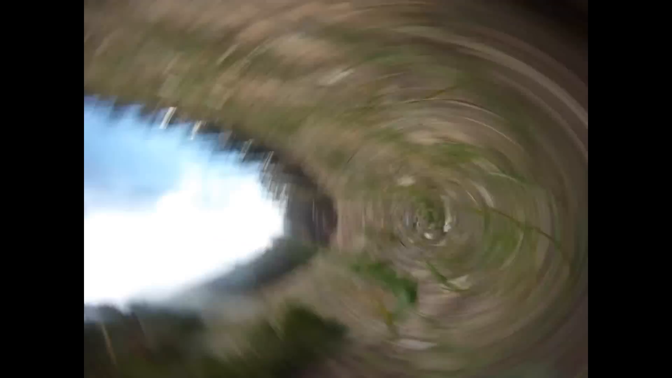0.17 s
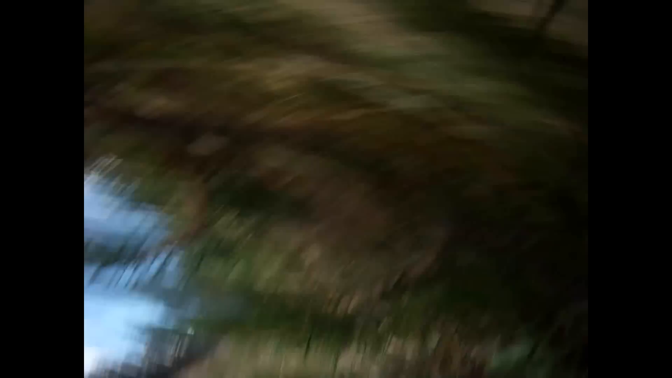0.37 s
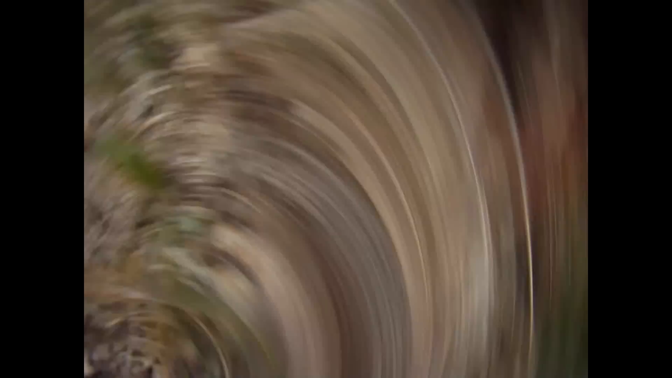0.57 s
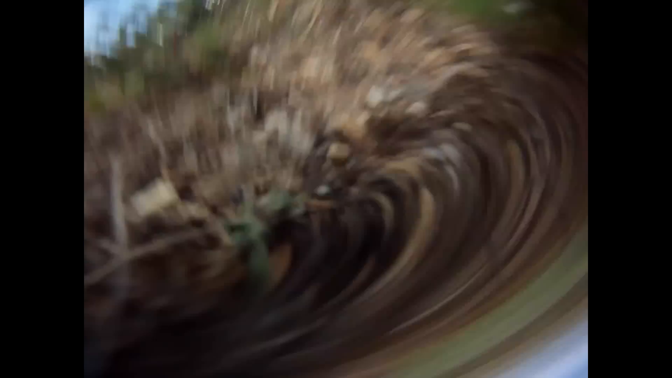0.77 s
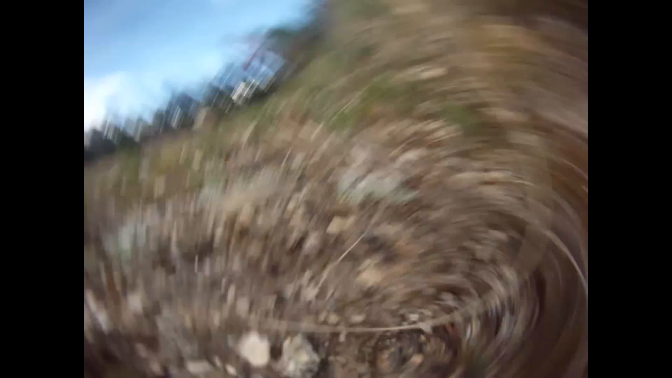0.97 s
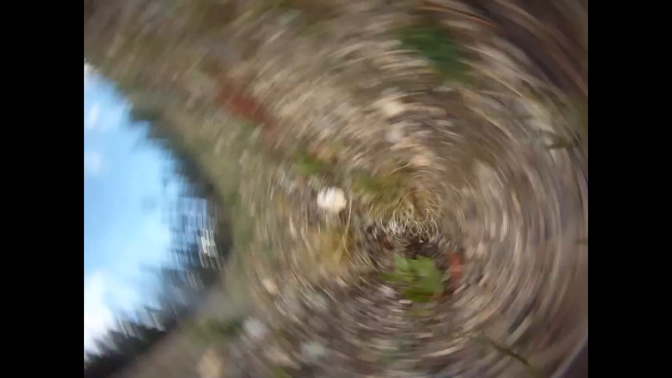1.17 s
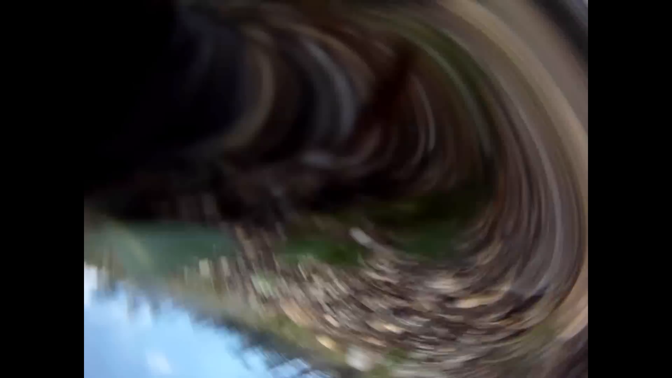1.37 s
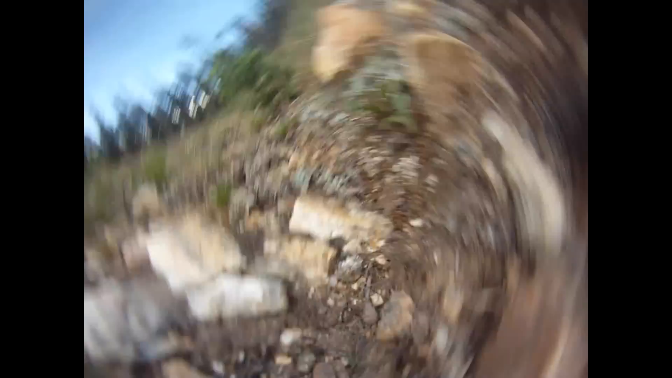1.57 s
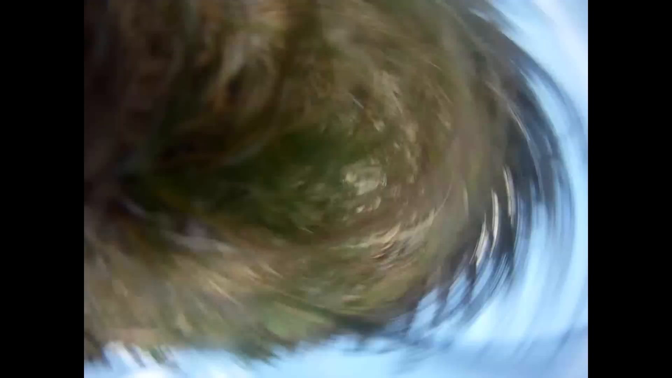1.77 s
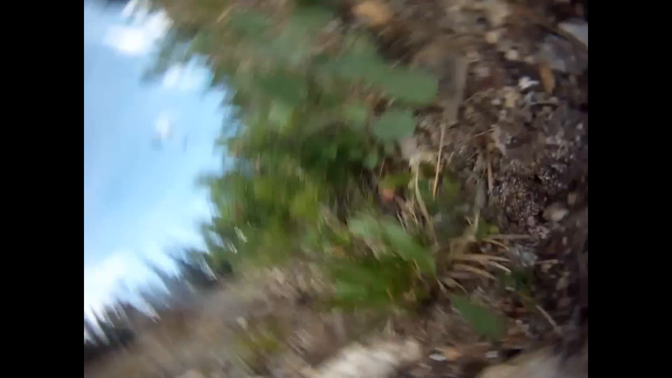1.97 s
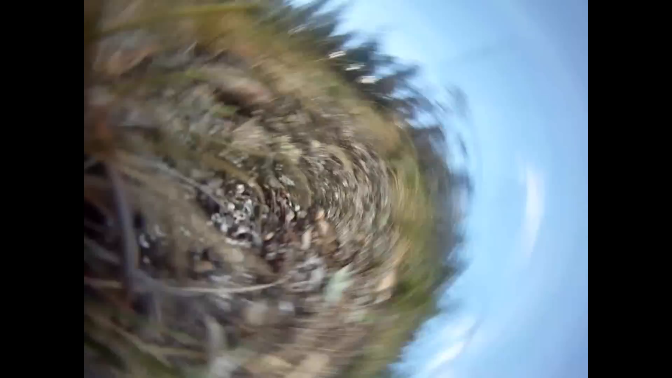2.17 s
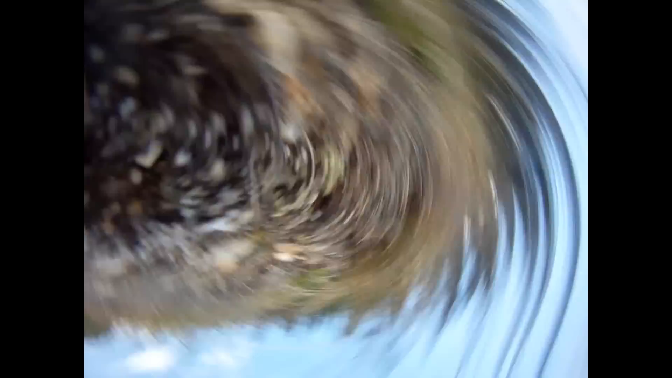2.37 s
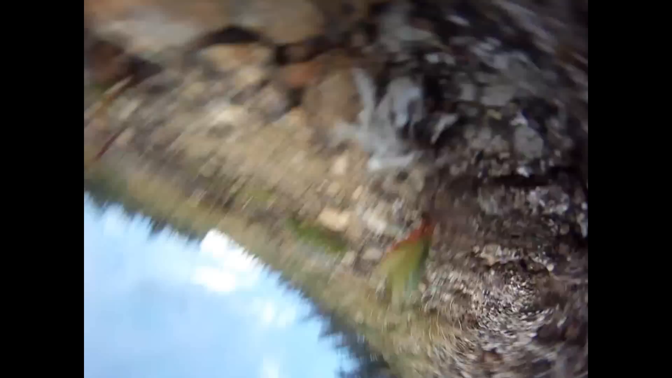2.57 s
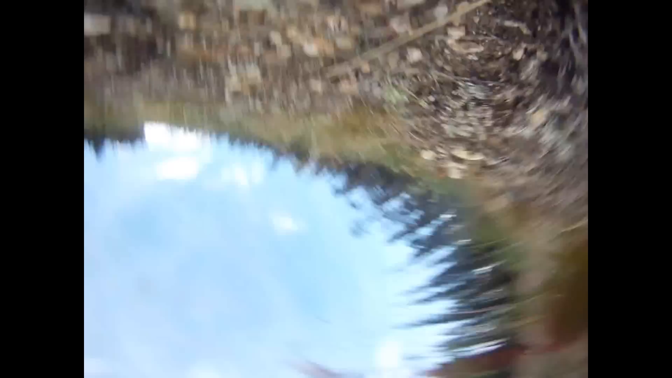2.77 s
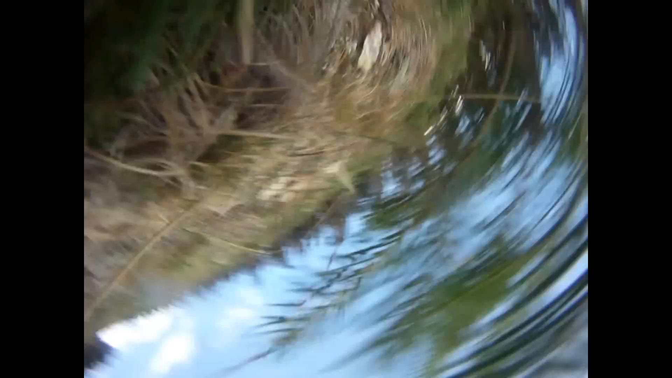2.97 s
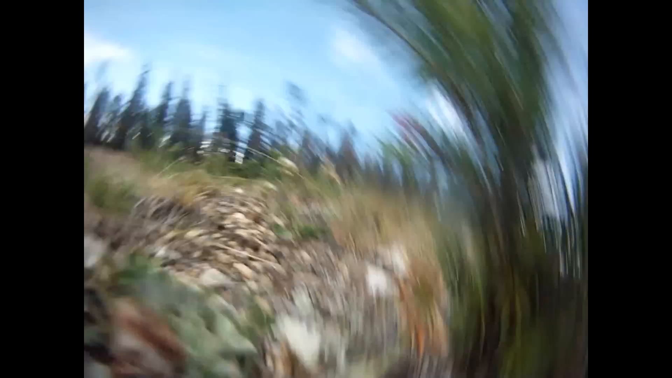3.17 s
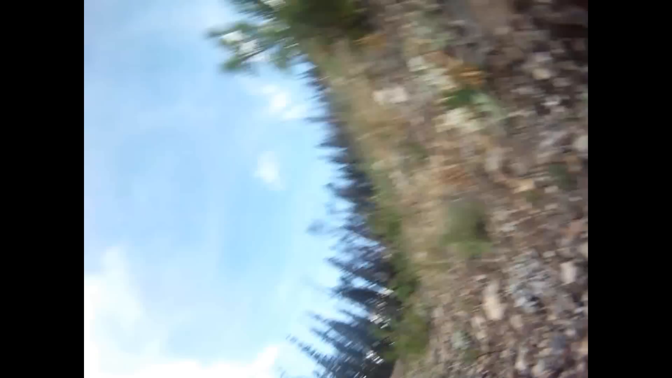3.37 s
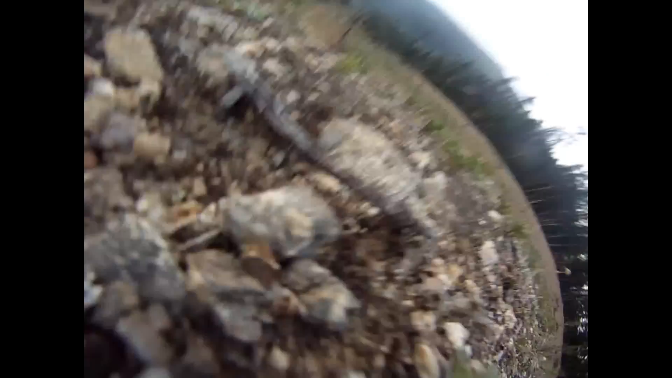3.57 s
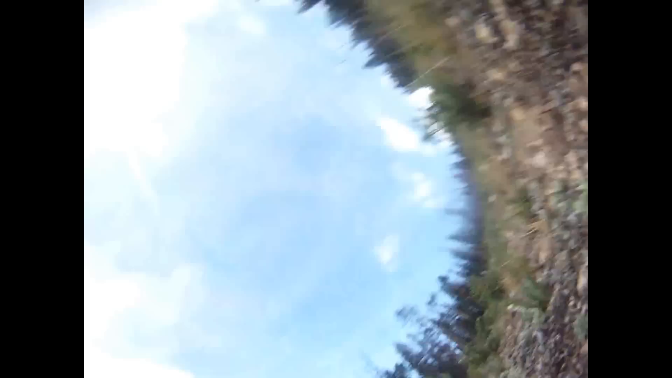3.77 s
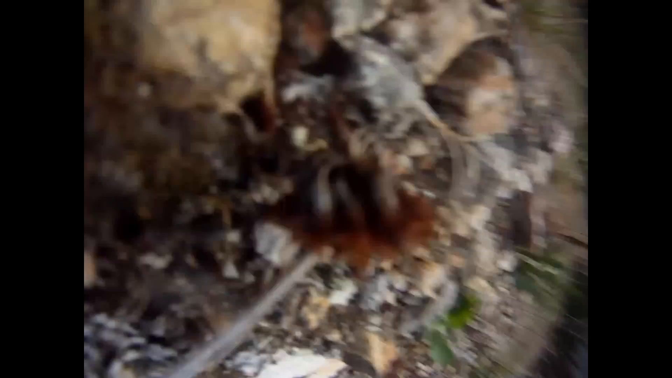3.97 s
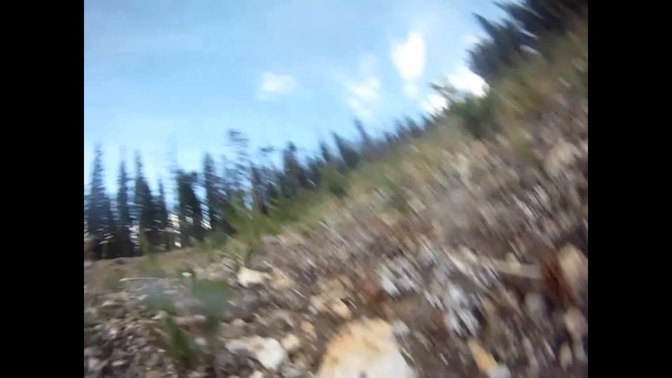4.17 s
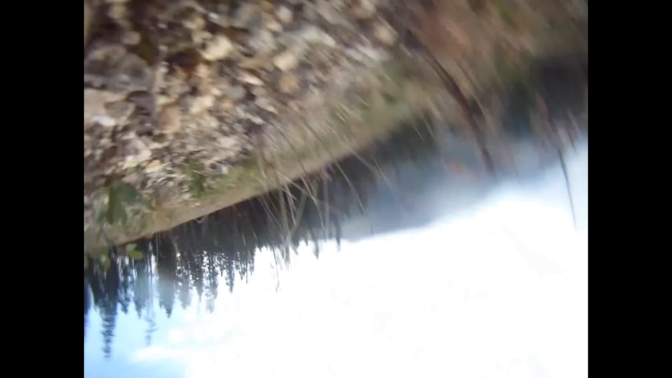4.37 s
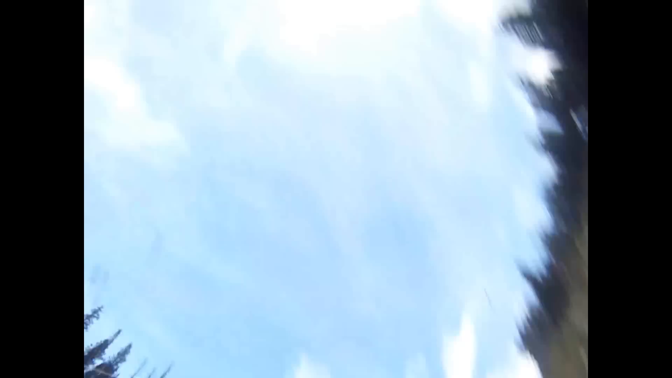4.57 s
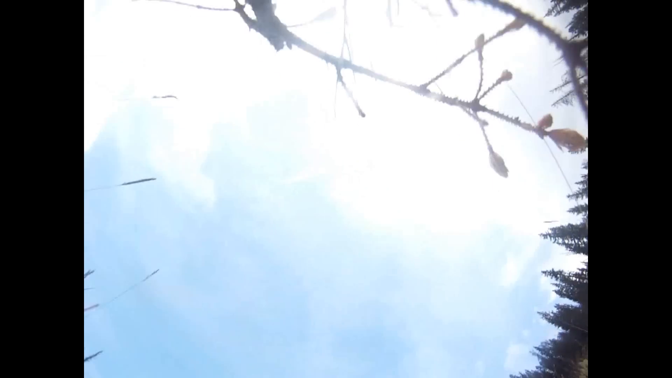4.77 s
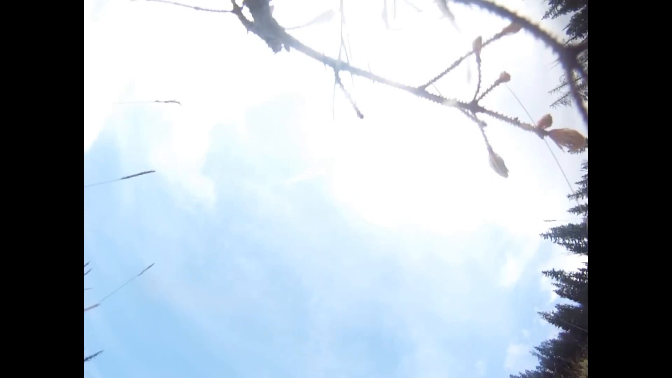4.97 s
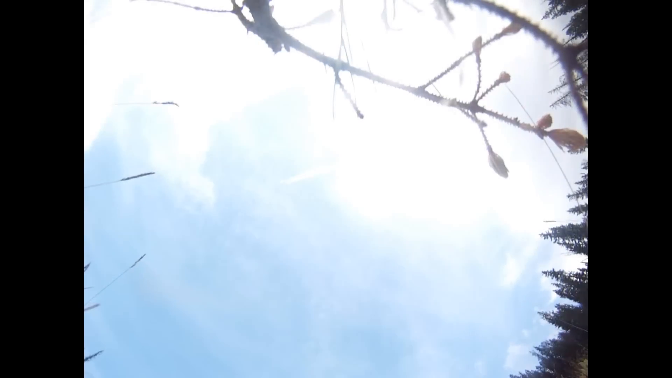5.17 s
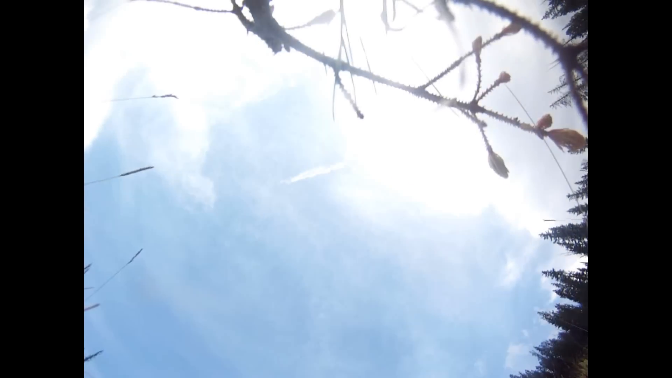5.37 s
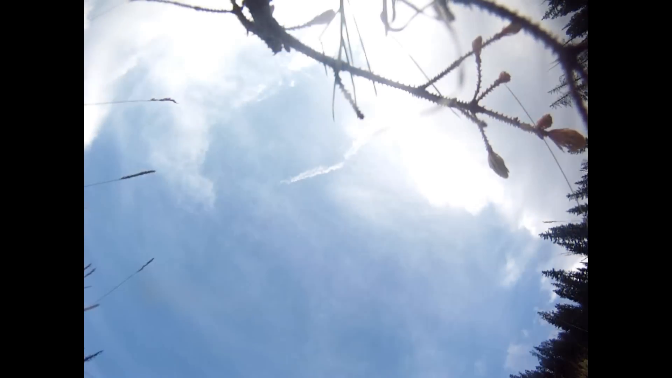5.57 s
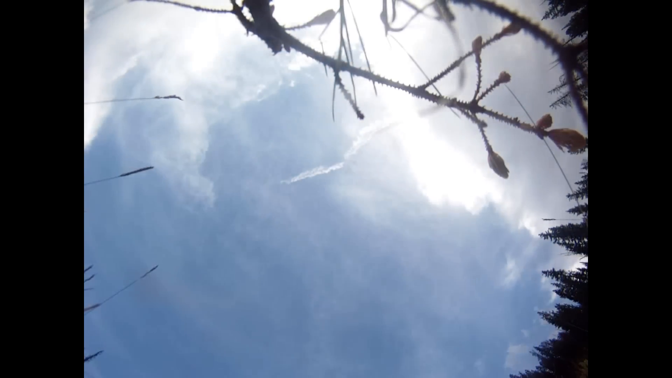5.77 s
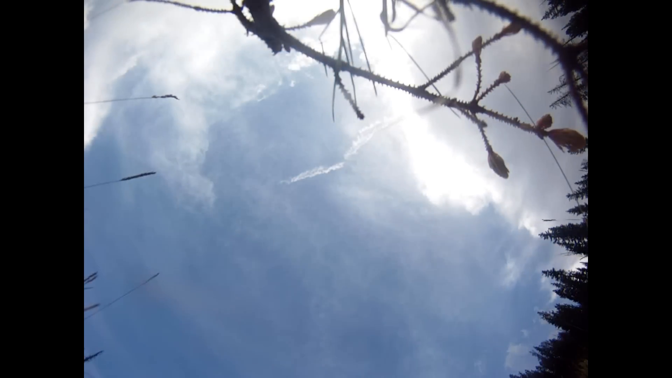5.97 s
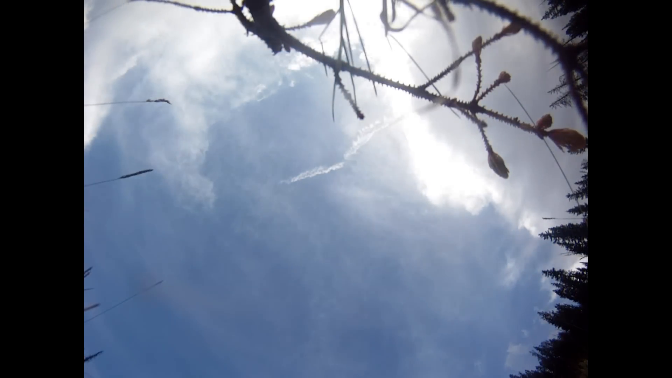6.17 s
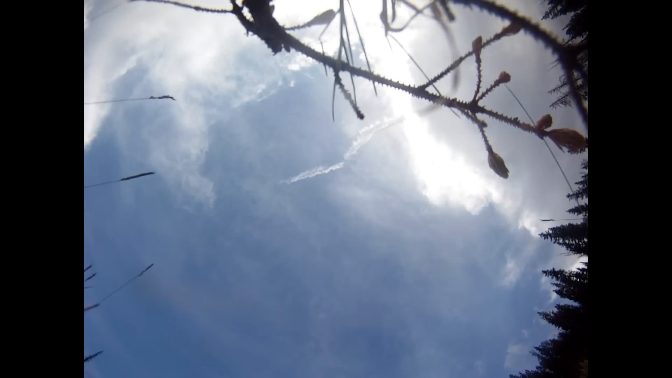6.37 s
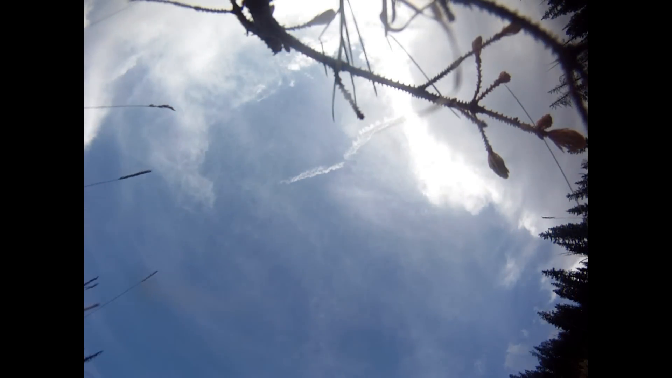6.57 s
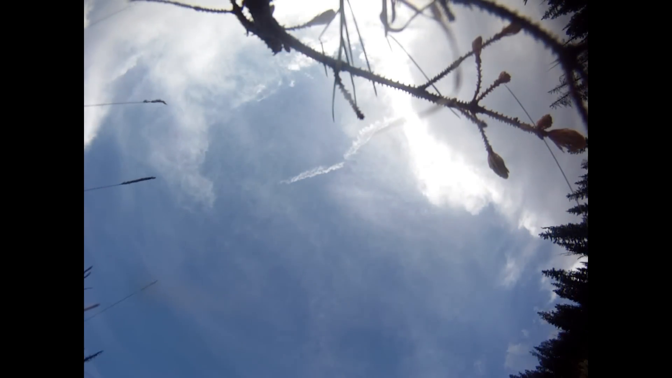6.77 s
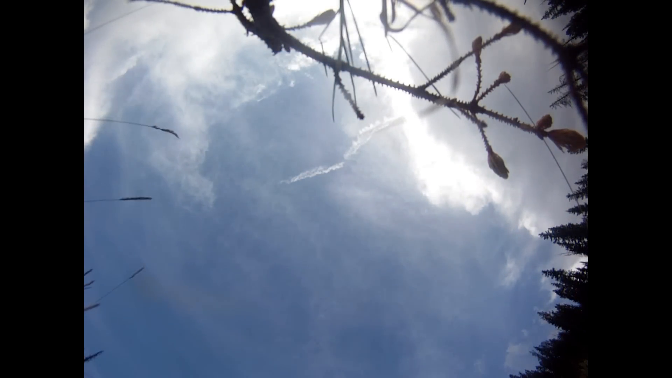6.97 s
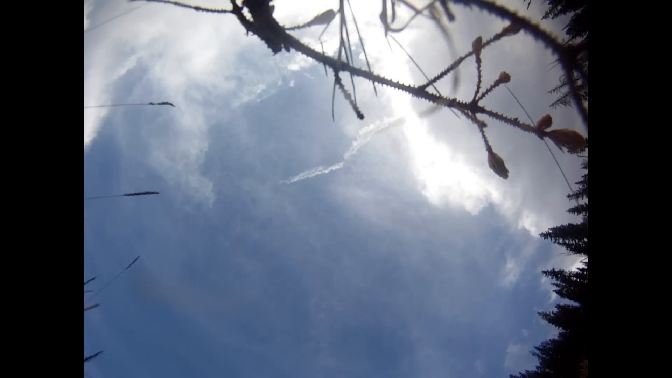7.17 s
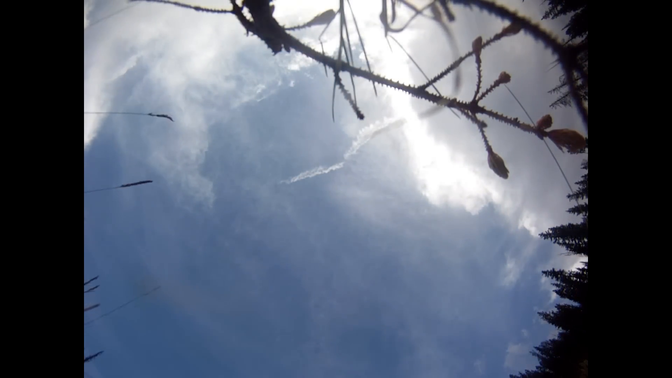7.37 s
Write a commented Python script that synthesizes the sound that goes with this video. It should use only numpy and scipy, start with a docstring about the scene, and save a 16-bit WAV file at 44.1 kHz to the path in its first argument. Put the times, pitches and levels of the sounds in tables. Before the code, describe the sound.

Hard, clacking hits come in quick, uneven succession as a little camera bounces over stones outdoors. The sound is extremely close, picked up by the camera itself, with dull thumps and short gritty scrapes among the knocks, and the strongest blows overload. The tumbling lasts roughly five seconds and stops. Then the air is very quiet, with a soft hiss and some tiny ticks as something brushes the case.

```python
"""A small camera tumbling down a stony slope.

The camera has come off a bike and is heard through its own microphone. Impacts on stones excite the
modes of its case and overload the input, and heavy landings push a thump of air into the port.
Between blows, friction with grit and dry grass drives the same modes. After about five seconds the
camera lies still in quiet open air, with a few faint ticks."""
import sys
import numpy as np
from scipy import signal
from scipy.fft import rfft, irfft
from scipy.io import wavfile
from scipy.ndimage import uniform_filter1d

SR = 44100
rng = np.random.default_rng(int(sys.argv[2]) if len(sys.argv) > 2 else 0)


def dump(signal):
    """Clip the signal to [-1, 1] and save it as 16-bit WAV at the path in sys.argv[1]."""
    limited = np.clip(np.atleast_2d(signal).T, -1, 1)
    pcm = np.round(limited * 32767).astype(np.int16)
    wavfile.write(sys.argv[1], SR, pcm)


N = 327661
TIME = np.arange(N) / SR
REST_S = 4.97   # the case has stopped rolling


def from_db(db):
    """Amplitude ratio of a level in decibels."""
    return 10 ** (np.asarray(db) / 20)


def rms_one(x):
    """Power normalisation: a lasting sound scaled to rms 1."""
    return x / np.sqrt(np.mean(x ** 2) + 1e-20)


def unit_energy(x):
    """Energy normalisation: a short sound scaled to energy 1."""
    return x / np.sqrt(np.sum(x ** 2) + 1e-20)


def band(x, low_hz, high_hz, order=2):
    """Butterworth band-pass filter."""
    edges_hz = [low_hz, min(high_hz, .45 * SR)]
    return signal.sosfilt(signal.butter(order, edges_hz, "band", fs=SR, output="sos"), x)


def band_noise(low_hz, high_hz, order=2):
    """Band-limited Gaussian noise of rms 1."""
    return rms_one(band(rng.standard_normal(N), low_hz, high_hz, order))


def resonate(x, hz, width_hz):
    """A damped resonator with unit gain at its peak."""
    r = np.exp(-np.pi * width_hz / SR)
    feedback = [1, -2 * r * np.cos(2 * np.pi * hz / SR), r * r]
    return signal.lfilter((1 - r * r) / 2 * np.array([1, 0, -1]), feedback, x + 1e-18)


def add(track, s, sound):
    """Superposition: a short sound joins the track at time s."""
    at = max(round(s * SR), 0)
    track[at:at + len(sound)] += sound[:N - at]


# Spectrum of still air and hiss. Each row: frequency in Hz, relative spectral density in dB.
AIR_SPECTRUM = [(15, -32), (25, -1), (118, -3.5), (181, -6.5), (501, -14), (621, -14.5), (4260, -24),
                (5880, -31), (15000, -30.5)]

def air():
    """Stationary coloured noise: a soft rush of open air with microphone hiss."""
    hz, db = np.transpose(AIR_SPECTRUM)
    bins_hz = np.arange(N // 2 + 1) * SR / N
    colour = from_db(np.interp(np.log(bins_hz + 1), np.log(hz), db))
    return from_db(-67) * rms_one(irfft(rfft(rng.standard_normal(N)) * colour, N))


def buffet():
    """Turbulence: air tugs at the port, very low, for as long as the camera spins."""
    spinning = np.interp(TIME, [REST_S - .1, REST_S + .1], [1, 0])
    return from_db(-72) * spinning * band_noise(12, 34, order=3)


def grit(per_s, spread_db, size):
    """Shot noise: grains give way as random impulses of uneven strength."""
    strength = from_db(spread_db * np.minimum(rng.exponential(1, size), 4))
    return (rng.random(size) < per_s / SR) * strength * rng.choice([-1, 1], size)


def pebble(force, count=6, low_hz=1900, high_hz=10500):
    """Free vibration: a struck pebble rings for a few milliseconds at its own natural frequencies."""
    modes_hz = low_hz * (high_hz / low_hz) ** rng.random(count)
    return sum(np.sqrt(low_hz / hz) * unit_energy(resonate(force, hz, width_hz=170)) for hz in modes_hz)


# Modes of the case and microphone port. Each row: frequency in Hz, bandwidth in Hz, gain in dB.
CASE_MODES = [(734, 190, -10.5), (1474, 520, -5.5), (2142, 250, 1.5), (2662, 380, -3.5), (2928, 240, -2),
              (3745, 340, -8), (4530, 390, -12), (5310, 140, -15.5), (7143, 780, -18), (8430, 130, -10.5),
              (8920, 160, -11.5), (9846, 290, -9), (14860, 870, -10.5), (13720, 120, -17)]

def struck_case(force, scatter):
    """Modal superposition: each grain touches another spot and so feeds the modes unevenly."""
    out = 0
    for k, (hz, width_hz, db) in enumerate(CASE_MODES):
        coupling = (-1) ** k + scatter * rng.standard_normal(len(force))
        out += from_db(db) * resonate(force * coupling, hz, width_hz)
    return out


def sliding_case(force, wander_db=1.5, turn_s=.06):
    """Moving excitation: one face after another rubs, so the broadened modes swell and fade in turn."""
    out, turns = 0, np.arange(0, TIME[-1], turn_s)
    for k, (hz, width_hz, db) in enumerate(CASE_MODES):
        swell_db = wander_db * np.interp(TIME, turns, rng.standard_normal(len(turns)))
        coupling = (-1) ** k + .35 * rng.standard_normal(N)
        out += from_db(db + swell_db) * resonate(force * coupling, hz, 1.5 * width_hz)
    return rms_one(out)


# Light touches on the resting case. Each row: time in seconds, relative peak level in dB.
TOUCHES = [(4.828, -32), (5.02, -47.5), (5.211, -50), (5.381, -48), (5.8944, -41), (6.0282, -52),
           (6.786, -52), (6.855, -50), (6.928, -44.5), (7.1886, -49), (7.239, -34.5)]

def ticks(settle_s=.0036, size=1500, faint_count=8):
    """Impulse response: tiny touches ring the case, a few clear ones among fainter ones."""
    out = np.zeros(N)
    faint = [(s, -55) for s in rng.uniform(REST_S, TIME[-1] - .1, faint_count)]
    for s, db in list(TOUCHES) + faint:
        force = grit(per_s=5000, spread_db=-2.5, size=size) * np.exp(-TIME[:size] / settle_s)
        force[0] += 3
        tick = struck_case(force, scatter=.32)
        tick += from_db(-2) * resonate(force, 1170, width_hz=340)
        tick += from_db(-.5) * resonate(force, 2365, width_hz=93)
        add(out, s, from_db(db + .5) * tick / np.abs(tick).max())
    return out


def crunches(count=240, size=900, fade_s=.002):
    """Random impacts: single pebbles and stalks snap past the moving case, each with its own ring."""
    out = np.zeros(N)
    for when, weakness in rng.random((count, 2)):
        force = grit(per_s=3700, spread_db=8.5, size=size) * np.exp(-TIME[:size] / fade_s)
        force[0] += 2
        shell = unit_energy(struck_case(force, scatter=.37))
        stone = from_db(-9) * unit_energy(pebble(force, count=3))
        add(out, when * REST_S, from_db(-20 * weakness) * (shell + stone))
    return rms_one(out)


# Grass gives way to bare stones. Each row: time in seconds, level of the rub against the rasp in dB.
GROUND = [(0, -17), (2.2, -13), (4.2, -6)]

def stoniness_db(s):
    """Surface hardness at time s: stonier ground sounds more hollow and snaps more distinctly."""
    return np.interp(s, *np.transpose(GROUND))


# Slides through grit and grass. Each row: start in seconds, end in seconds, relative level in dB.
SLIDE_SPANS = [(0, 0.048, -24), (0.118, 0.248, -72.5), (0.282, 0.34, -18.5), (0.363, 0.545, -33),
               (0.593, 0.685, -51), (0.69, 0.812, -32.5), (.93, 1.154, -56), (1.402, 1.437, -26.5),
               (1.529, 1.578, -22.5), (1.752, 2.003, -38.5), (2.177, 2.303, -31), (2.335, 2.438, -18),
               (2.453, 2.516, -34), (2.635, 2.72, -55), (2.817, 3.04, -33), (3.019, 3.255, -25),
               (3.3, 3.296, -41), (3.667, 3.771, -36.5), (3.837, 3.99, -45), (4.07, 4.146, -40.5),
               (4.165, 4.229, -25.5), (4.272, 4.408, -52), (4.42, 4.454, -24), (4.493, 4.52, -38),
               (4.632, 4.799, -45.5), (4.892, 4.984, -72.5)]

def slide_pressure(attack_s=.0034, release_s=.0054, plough_s=.007, dig_s=.014, dig_db=-16):
    """Contact force: each slide sets in, holds and lets go, digging in harder around every blow."""
    steady, grounded, dig = np.zeros((3, N))
    for start, end, db in SLIDE_SPANS:
        t = TIME[:round((end - start + 10 * release_s) * SR)]
        contact = np.minimum(t / attack_s, 1) * np.exp(-np.maximum(t - (end - start), 0) / release_s)
        add(grounded, start, contact)
        add(steady, start, from_db(db) * contact)
    for s, db, *_ in HEAVY_LANDINGS + GLANCING_BLOWS:
        near = slice(*np.searchsorted(TIME, [s - 10 * plough_s, s + 10 * dig_s]))
        t = TIME[near] - s   # negative while the case ploughs through grit toward the stone
        dig[near] += from_db(db + dig_db) * np.exp(np.minimum(t / plough_s, -t / dig_s))
    return np.hypot(steady, np.minimum(grounded, 1) * dig)


def scrape():
    """Sliding friction: clumps of grains and stalks rasp on the case, which hums and rumbles faintly."""
    jolts = from_db(.5 * band_noise(10, 57))   # uneven ground
    clumps = from_db(2.9 * band_noise(25, 160))
    force = grit(per_s=2800, spread_db=.5, size=N) * clumps
    stony_db = stoniness_db(TIME)
    rasp = sliding_case(force) + from_db(8 + .65 * stony_db) * crunches()
    hollow_rub = from_db(stony_db) * rms_one(resonate(rasp, 910, width_hz=1000))
    rasp = band(rms_one(rasp) + hollow_rub, 670, 16900, order=3)
    rasp = band(rasp, 200, 11300, order=1)   # soft grit excites less treble than a blow
    rasp /= np.sqrt(uniform_filter1d(rasp ** 2, size=2400) + 1e-12)   # leave the level to the pressure
    rumble = from_db(-22) * band_noise(26, 88)
    hum = from_db(-26.5) * rms_one(band(force, 140, 620))   # the shell, driven below its modes
    return slide_pressure() * (from_db(-1.5) * jolts * (rasp + hum) + rumble)


# The case lands with its full weight. Each row: time in seconds, relative knock level in dB, contact
# time in seconds, frequency of the struck panel in Hz, relative thump peak in dB.
HEAVY_LANDINGS = [(.286, -6, 0.0092, 2030, -28), (.338, -6, 0.0038, 2050, -19.5),
                  (.565, 1, 0.0052, 2800, -2.5), (.788, -11.5, 0.0089, 3210, -15),
                  (.804, -17.5, 0.0057, 644, -10.5), (0.908, -6, 0.0057, 1790, -18.5),
                  (1.091, -11, 0.0088, 3840, -13.5), (1.416, -17, 0.0062, 2350, -8.5),
                  (1.674, -4.5, .012, 855, -16), (1.743, -12, 0.0052, 3490, -18),
                  (1.957, -10, 0.0056, 2140, -11.5), (2.1, 0, 0.0057, 2060, -6),
                  (2.194, -11.5, .01, 2570, -20), (2.438, -9, 0.006, 3710, -13.5),
                  (2.541, -2.5, 0.004, 2310, -24.5), (2.590, -6, 0.003, 816, -26),
                  (2.677, -19, 0.0038, 1740, -13), (2.698, -11, 0.0092, 2350, -15.5),
                  (2.838, -2.5, 0.0056, 1990, -14.5), (3.152, -23, .007, 2100, -20.5),
                  (3.236, -1, 0.0086, 2210, -26), (3.308, -5.5, 0.0085, 1970, -22),
                  (3.398, -6, 0.0021, 3636, -19), (3.536, -15.5, 0.0071, 2690, -9.5),
                  (3.669, -6, 0.0071, 2280, -9.5), (3.719, -10.5, 0.00057, 520, -26),
                  (3.841, -18, 0.011, 2000, -13), (4.066, -3, 0.0076, 2390, -12),
                  (4.269, -11, 0.0038, 490, -18), (4.438, -11, 0.0063, 1910, -26.5),
                  (4.459, -10, 0.0025, 790, -35), (4.517, -9.5, 0.0045, 2090, -17.5),
                  (4.564, -6, 0.0016, 860, -29), (4.668, -4, 0.0063, 3485, -12),
                  (4.768, -5.5, 0.0028, 673, -11.5)]

def thumps(firm_hz=156, db_per_octave=17, release_stretch=1.315):
    """Compression pulse: a landing squeezes the air in the port, which springs back more slowly."""
    out = np.zeros(N)
    for s, knock_db, contact_s, _, db in HEAVY_LANDINGS:
        hz = firm_hz * 2 ** (knock_db / db_per_octave)   # softer ground: weaker knock, deeper thump
        phase = 2 * np.pi * hz * (TIME[:round(3 * SR / hz)] - 1 / hz)
        touch = np.clip(phase + 2.6, 0, 1)   # nothing moves before the case meets the ground
        phase = np.where(phase > 0, phase / release_stretch, phase)
        swing = touch * phase * np.exp((1 - phase ** 2) / 2)
        deepest_squeeze_s = s + .76 * contact_s
        add(out, deepest_squeeze_s - 1 / hz, from_db(db) * swing)
    return out


def knock(db, contact_s, hollow_db, panel_hz, release_s=.0012, chatter_s=.005, size=2600):
    """Impact excitation: grit is crushed between case and stone, then loose grains chatter briefly."""
    t = TIME[:size]
    since_release = np.maximum(t - .81 * contact_s, 0)
    chatter = from_db(-30) * np.exp(-since_release / chatter_s)
    pressure = np.exp(-.3 * np.minimum(t / contact_s, 1)) * (np.exp(-since_release / release_s) + chatter)
    force = grit(per_s=9000, spread_db=3.5, size=size) * pressure
    force[0] += 2   # first hard touch
    shell = unit_energy(struck_case(force, scatter=.4))
    panel = from_db(-4.5) * unit_energy(resonate(force, panel_hz, width_hz=230))
    stone = from_db(-24.5) * unit_energy(pebble(force))
    low_ring = resonate(force, 780, width_hz=470) + 1.4 * band(force, 158, 704)
    hollow = from_db(hollow_db - 13.5) * unit_energy(low_ring)
    energy = (contact_s + .0011) * SR   # a longer contact delivers more
    return from_db(db) * np.sqrt(energy) * unit_energy(shell + panel + stone + hollow)


# An edge clips a stone, thin and without a thump. Each row: time in seconds, relative level in dB,
# contact time in seconds, frequency of the struck panel in Hz.
GLANCING_BLOWS = [(0, -10, 0.0045, 2240), (.05, -16, 0.0016, 3600), (0.063, -17, 0.0034, 3980),
                  (.463, -25.5, 0.0055, 1710), (1.061, -5.5, 0.001, 2400), (1.171, -26, 0.0077, 2520),
                  (1.218, -39.5, 0.0056, 2780), (1.397, -11, .008, 2180), (1.53, -12, 0.0082, 2310),
                  (1.761, -24, 0.0036, 2330), (1.915, -26, 0.021, 2350), (1.94, -16, 0.022, 2070),
                  (2.044, -36.5, 0.0036, 2360), (2.375, -10.5, 0.002, 2126), (2.884, -24.5, .007, 910),
                  (3.017, -13.5, 0.0073, 1720), (3.043, -10.5, 0.00054, 3460), (3.145, -13, 0.0025, 2080),
                  (3.751, -25.5, 0.0034, 1050), (3.801, -32, 0.02, 2200), (3.878, -3, 0.0029, 3050),
                  (3.916, -24, 0.0046, 3200), (3.982, -22, 0.012, 2200), (4.081, -11.5, 0.0016, 2100),
                  (4.111, -21, 0.0055, 1000), (4.129, -23.5, 0.0028, 1530), (4.205, -20, 0.0048, 2130),
                  (4.22, -15, 0.007, 2930), (4.261, -18.5, 0.0047, 2470), (4.287, -22, 0.0052, 551),
                  (4.316, -9.5, 0.0057, 2010), (4.416, -14, .005, 2150), (4.648, -14.5, 0.0057, 1720),
                  (4.796, -18, 0.00033, 1210)]

def knocks():
    """Successive collisions: more weight behind a blow and stonier ground excite more low ring."""
    landings = [(s, db, contact_s, panel_hz, 6.5 + .25 * (thump_db - db))
                for s, db, contact_s, panel_hz, thump_db in HEAVY_LANDINGS]
    glances = [(*row, -7) for row in GLANCING_BLOWS]
    out = np.zeros(N)
    for s, db, contact_s, panel_hz, hollow_db in landings + glances:
        ground_db = .25 * (stoniness_db(s) + 9)   # zero on middling ground
        add(out, s, knock(db, contact_s, hollow_db + ground_db, panel_hz))
    return out


def scene():
    """Superposition at the microphone: the close tumble, then the quiet around the resting camera."""
    tumble = knocks() + thumps() + scrape() + buffet()
    return (from_db(12) * tumble + ticks() + air())[None]


def gain_control(x, threshold_db=-56, range_db=13, fall_db_per_s=130):
    """Two-to-one compression: gain drops at once on a loud sound and creeps back after it."""
    level_db = 10 * np.log10(np.maximum(uniform_filter1d(x ** 2, size=300), 1e-12))
    fall_db = fall_db_per_s * TIME
    held_db = np.maximum.accumulate(level_db + fall_db) - fall_db
    cut_db = np.clip((held_db - threshold_db) / 2, 0, range_db)
    return x * from_db(-uniform_filter1d(cut_db, size=100))


def overload(x, ceiling=.55, hardness=8):
    """Saturation: large swings are flattened against the ceiling."""
    return x / (1 + np.abs(x / ceiling) ** hardness) ** (1 / hardness)


def record(dry, notch_hz=(11100, 13000), cutoff_hz=15200):
    """The camera's signal chain: compression, input overload, treble notch, output ceiling, low-pass."""
    flattened = overload(gain_control(dry))
    notch = signal.butter(2, notch_hz, "bandstop", fs=SR, output="sos")
    limited = overload(1.011 * signal.sosfilt(notch, flattened))
    low_pass = signal.firwin(65, cutoff_hz, fs=SR, window="blackman")
    return signal.fftconvolve(limited, low_pass[None], "same")


dry = scene()
out = record(dry)
dump(out)
```